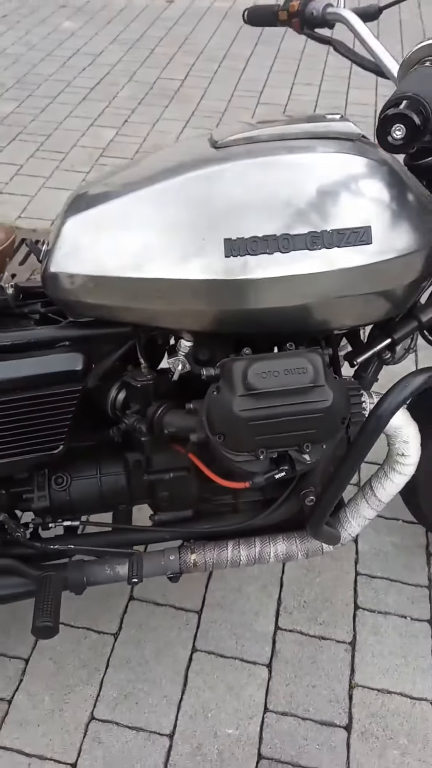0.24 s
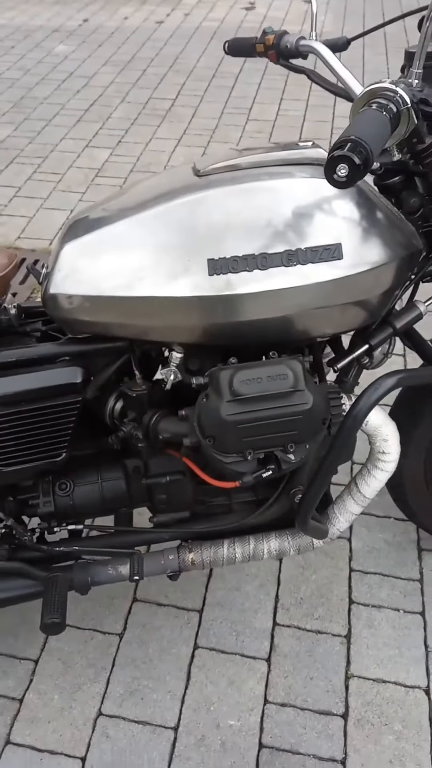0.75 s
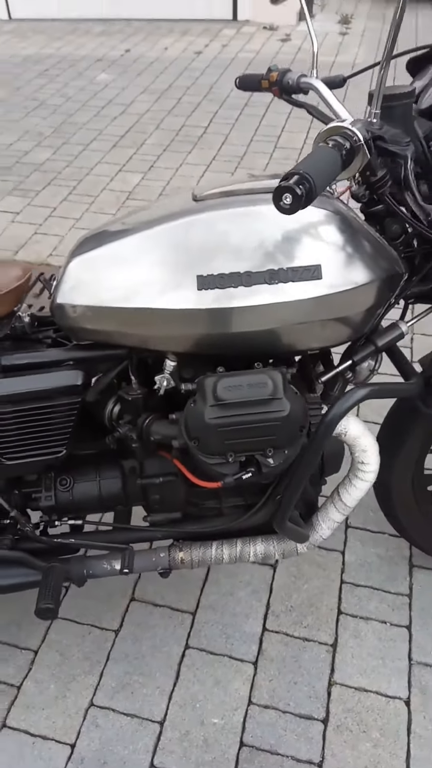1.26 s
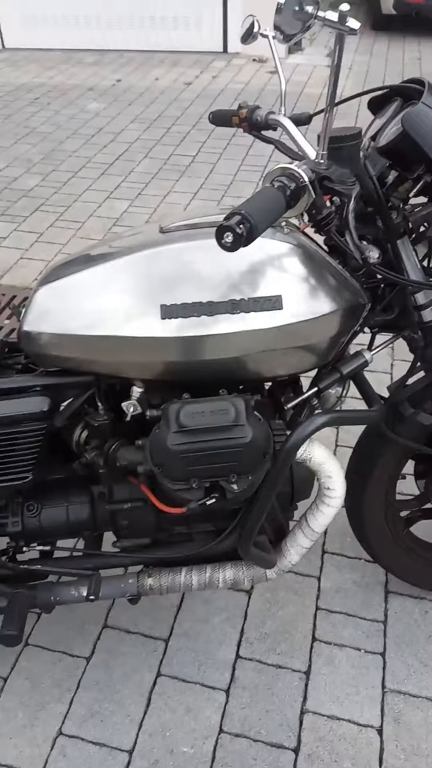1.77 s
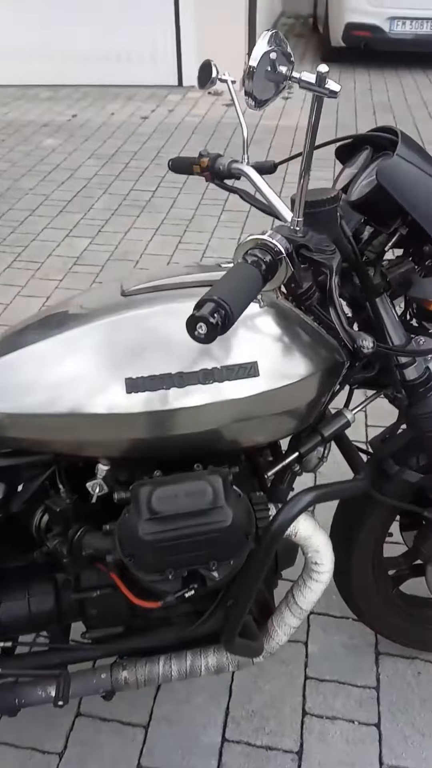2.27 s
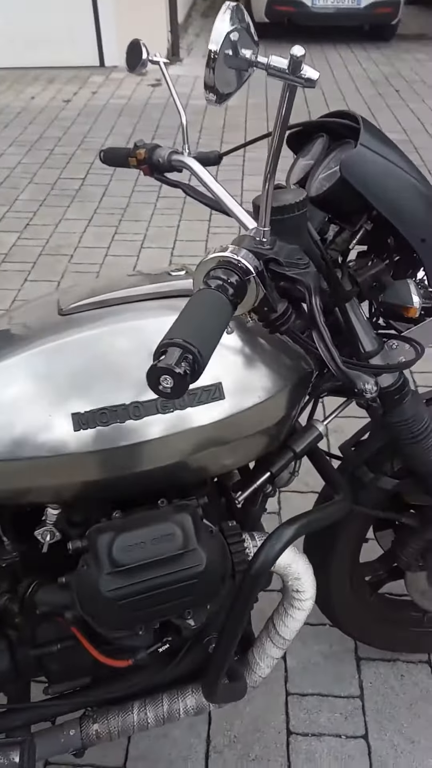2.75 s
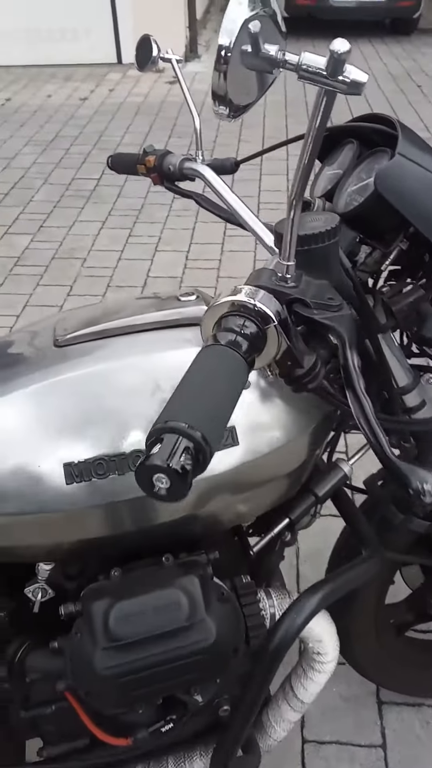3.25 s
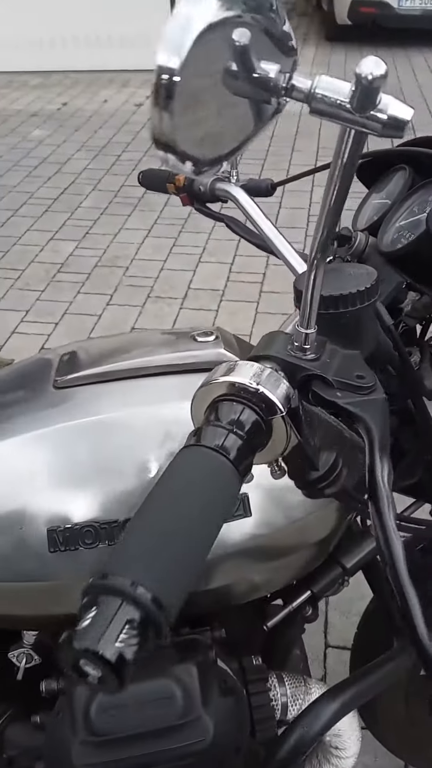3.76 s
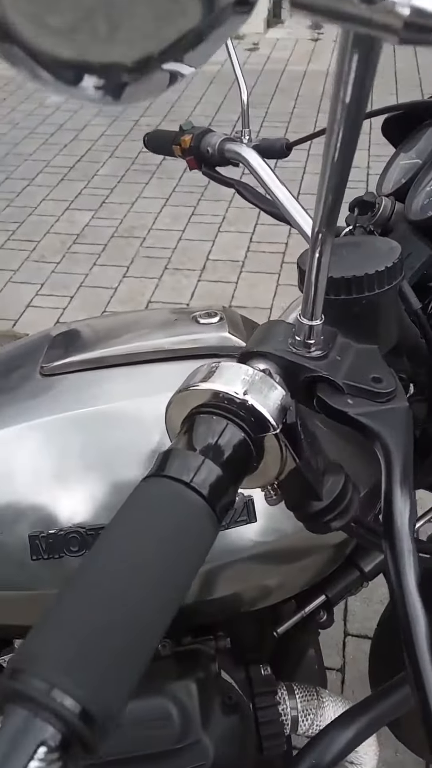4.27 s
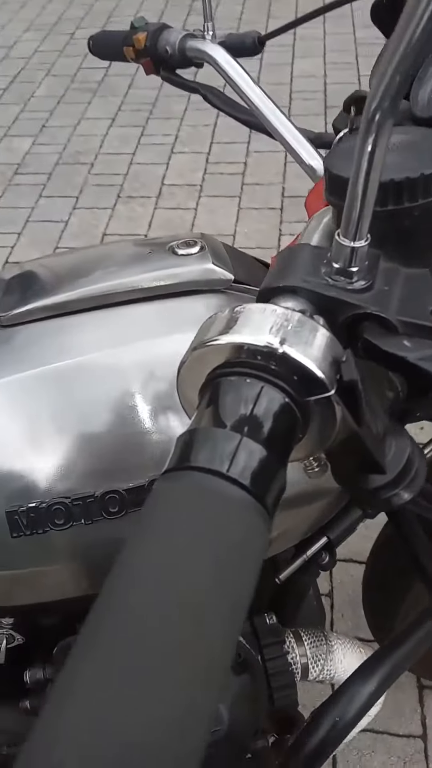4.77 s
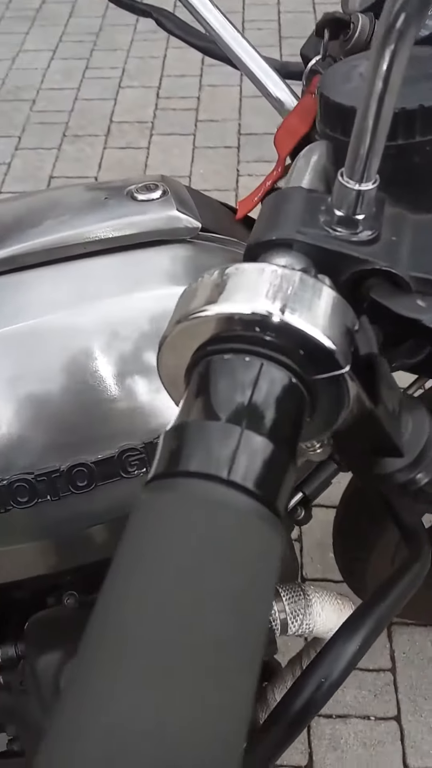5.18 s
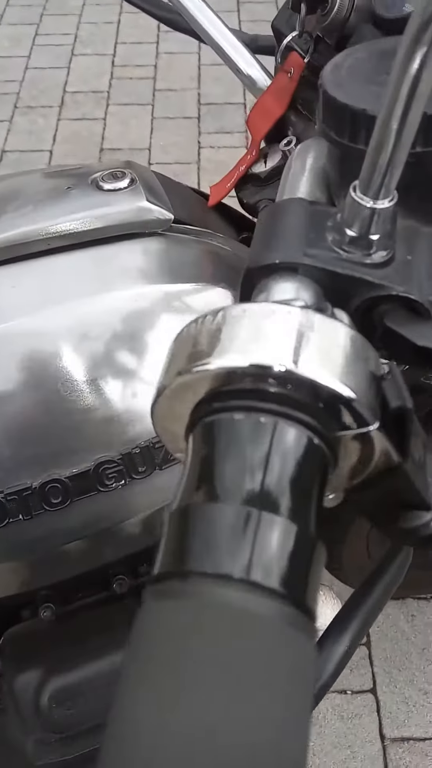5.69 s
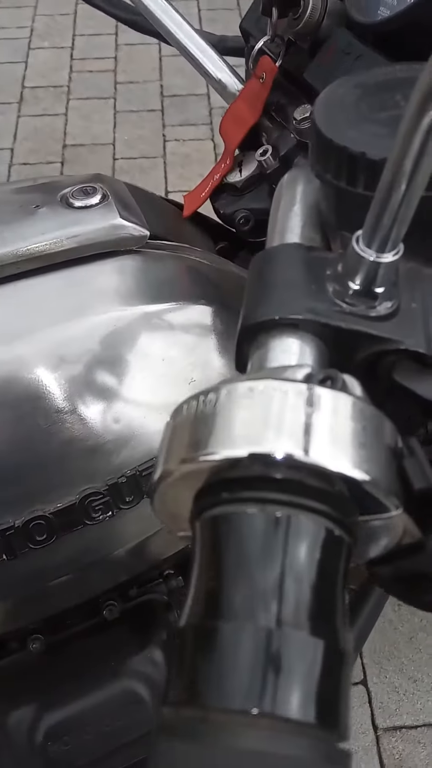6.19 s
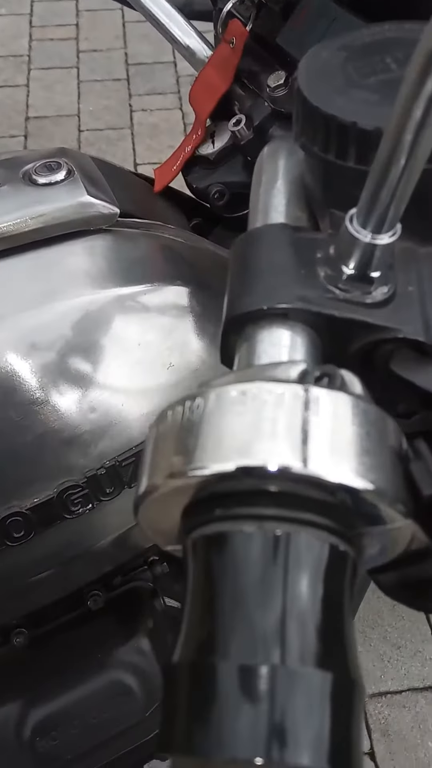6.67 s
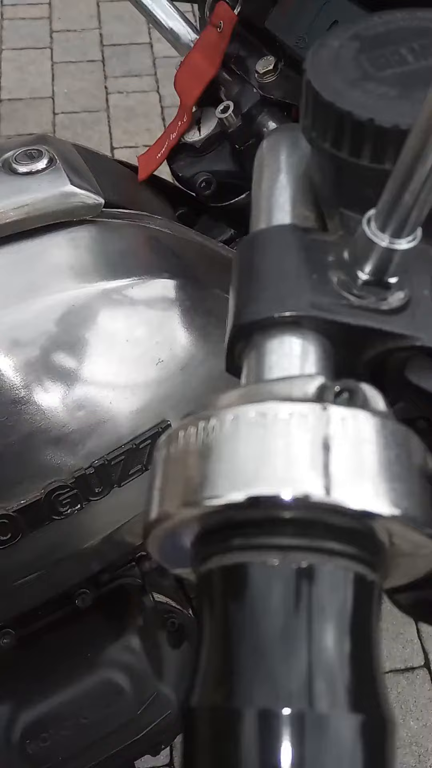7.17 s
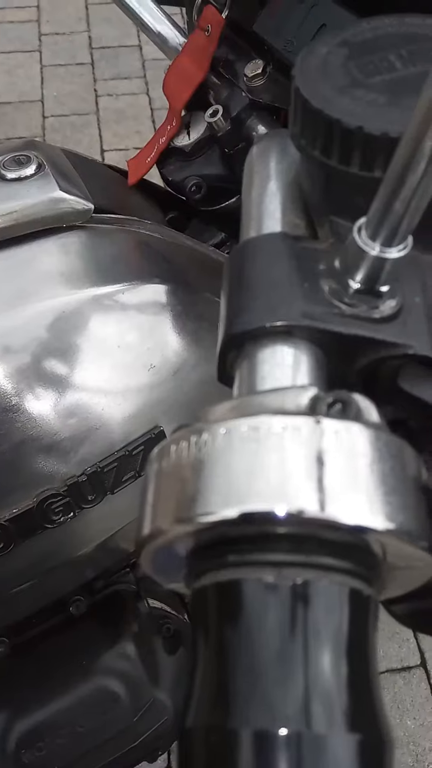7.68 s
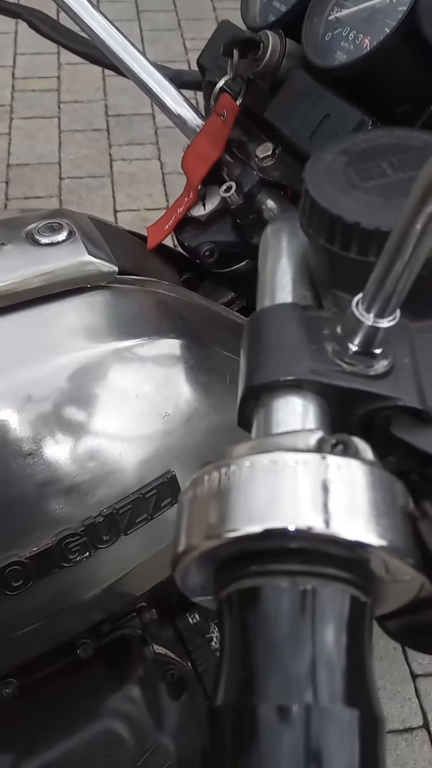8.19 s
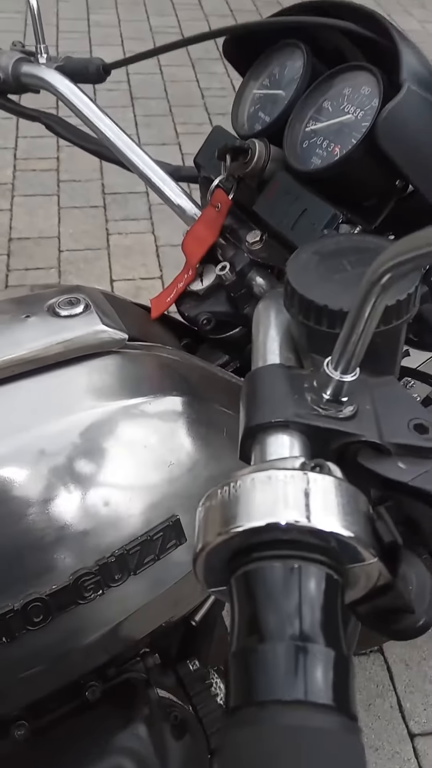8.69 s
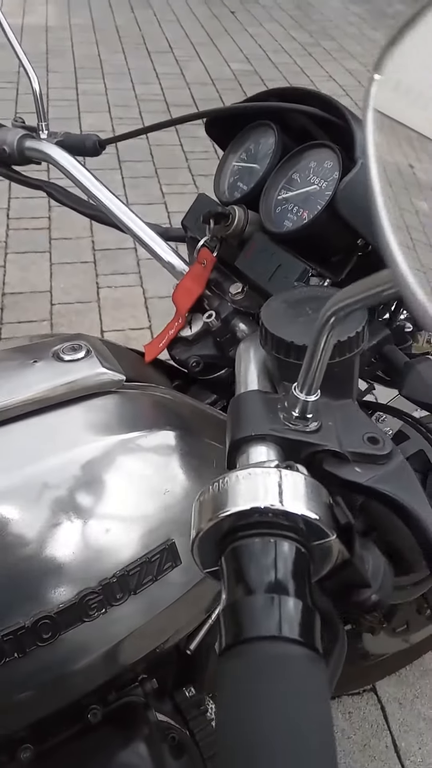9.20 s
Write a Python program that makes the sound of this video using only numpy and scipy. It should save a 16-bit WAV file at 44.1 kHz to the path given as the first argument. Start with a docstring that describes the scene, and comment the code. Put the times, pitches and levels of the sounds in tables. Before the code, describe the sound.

A twin-cylinder motorcycle idles outdoors on paving, heard from very close. The exhaust thumps in a deep, uneven two-beat with a low burble, while valves tick and gears whirr and rattle in time. A few beats come weak early on, and the tone shifts slightly as the microphone rises from the engine to the handlebar. The idle sags around the middle, then recovers and carries on.

```python
"""A V-twin motorcycle idles on paving: each cylinder booms through its own silencer in an uneven two-beat,
gas burbles in the pipes, and gears, pushrods and valves ring the castings in step with the crank.
At first the listener draws close to the engine's side, and a few firings come weak. From about 2 to 4 s
the listener rises to the handlebar. The hunting idle sags to its slowest just after 5 s, then recovers,
and two more weak firings follow near the end."""
import sys
import numpy as np
from scipy import signal
from scipy.fft import rfft, irfft, next_fast_len
from scipy.io import wavfile

SR = 44100
rng = np.random.default_rng(int(sys.argv[2]) if len(sys.argv) > 2 else 0)


def unload_audio(sound):
    """Save the sound as a 16-bit wav file, at the path given as the first command line argument."""
    columns = np.transpose(np.atleast_2d(sound))
    # keep every value between -1 and 1, then stretch to whole-number steps
    steps = np.round(np.clip(columns, -1, 1) * 32767)
    wavfile.write(sys.argv[1], SR, steps.astype(np.int16))


N = 416304
TIME = np.arange(N) / SR
PADDED = next_fast_len(N + SR // 10, True)

# modes of castings, covers and fins: (frequency [Hz], width [Hz], peak height [dB])
CASTING_MODES = [(550, 49, 1.5), (640, 38, 3.5), (1360, 78, 4.5), (2200, 60, 2), (2506, 32, 6.5),
                 (2902, 29, 8.5), (3246, 44, 6.5), (3410, 34, 7.5), (3910, 48, 2.5), (4260, 50, 3),
                 (4830, 170, 4.5), (6506, 153, 5), (7240, 90, 11.5)]


def gain_of(db):
    """Amplitude ratio of a level in decibels."""
    return 10 ** (np.asarray(db) / 20)


def unit_rms(x):
    """Normalisation to an rms of 1."""
    return x / np.sqrt(np.mean(x ** 2) + 1e-20)


def over_time(points):
    """Linear interpolation of a curve at every sample."""
    return np.interp(TIME, *np.transpose(points))


def over_frequency(points, hz):
    """Interpolation of a spectrum on a log-frequency axis."""
    f, value = np.transpose(points)
    return np.interp(np.log(hz + 1), np.log(f + 1), value)


def peaks_db(peaks, hz):
    """Resonance curves: a sum of Lorentzian peaks and dips, in decibels."""
    return sum(height / (1 + (2 * (hz - f) / width) ** 2) for f, width, height in peaks)


def colour(x, spectrum, peaks=(), size=16384):
    """Minimum-phase filtering: the response is causal, so resonances ring on after a blow."""
    hz = np.fft.rfftfreq(size, 1 / SR)
    db = over_frequency(spectrum, hz) + peaks_db(peaks, hz)
    cepstrum = irfft(np.log(gain_of(db)))
    cepstrum[1:size // 2] *= 2
    cepstrum[size // 2 + 1:] = 0
    response = irfft(np.exp(rfft(cepstrum)))[:size // 2]
    return signal.oaconvolve(np.atleast_2d(x), response[None], axes=1)[:, :N]


def drift(per_s):
    """Slow random modulation: straight lines between Gaussian values."""
    knots = np.arange(0, TIME[-1] + 1, 1 / per_s)
    return np.interp(TIME, knots, rng.standard_normal(len(knots)))


def chatter(strikes, decay_s):
    """Damping: each impulse becomes an exponentially decaying burst of noise."""
    envelope = signal.lfilter([1], [1, -np.exp(-1 / (decay_s * SR))], strikes)
    return envelope * rng.standard_normal((2, N))


def impacts(per_s, spread_db, rub):
    """Contact noise: tiny metal impacts arrive as a Poisson process over steady rubbing."""
    sizes = gain_of(spread_db * np.minimum(rng.exponential(1, N), 4))
    strikes = sizes * (rng.random(N) < per_s / SR)
    contacts = unit_rms(chatter(strikes, decay_s=0.00038))
    return unit_rms(contacts + rub * rng.standard_normal((2, N)))


def by_place(beside, above):
    """Linear crossfade as the listener moves between the engine's side and the handlebar above it."""
    # listener's path: (time [s], position [0 beside the engine, 1 at the handlebar])
    path = [(0, 0.34), (2.2, 0.032), (4, 0.9), (9.44, 0.88)]
    return beside + (above - beside) * over_time(path)


def place_gain(beside_db, above_db):
    """A source's level depends on where the listener is."""
    return gain_of(by_place(beside_db, above_db))


def cycles(start_phase=-0.4703):
    """Phase is the integral of speed: counts four-stroke cycles, each two turns of the crank."""
    # hunting idle: (time [s], crank speed [rpm])
    idle_speed = [(0.0, 718.4), (0.7, 696.7), (0.79, 629.1), (1.1, 700.2), (2.32, 686.3), (2.96, 728.5),
                  (3.53, 629.4), (3.64, 680.5), (4.3, 610.4), (4.39, 659.6), (5.31, 577.1), (5.42, 631.4),
                  (6.02, 639.8), (6.11, 690.4), (6.68, 653.2), (6.91, 716.4), (7.11, 655.8), (7.84, 671.4),
                  (7.93, 725.3), (8.68, 696.3), (8.78, 647.5), (9.44, 708.6)]
    return start_phase + np.cumsum(over_time(idle_speed)) / (120 * SR)


def once_a_cycle(phase, spread_db, unusual=()):
    """Impulse train locked to the crank, of random strength; an unusual impulse replaces the nearest."""
    turned = cycles()
    due = np.arange(np.ceil(turned[0] - phase), turned[-1] - phase) + phase
    times = np.interp(due, turned, TIME)
    sizes_db = spread_db * np.clip(rng.standard_normal(len(times)), -2, 1)
    for time_s, db in unusual:
        nearest = np.argmin(abs(times - time_s))
        times[nearest], sizes_db[nearest] = time_s, db
    train = np.zeros(N)
    inside = (times >= 0) & (times < (N - 1) / SR)
    train[np.round(times[inside] * SR).astype(int)] = gain_of(sizes_db[inside])
    return train


def cam_load(slack_db=-4.5, attack_cycles=0.027, release_cycles=0.029):
    """Periodic loading of the valve train: each cam lift builds, holds and lets go; their powers add."""
    # cam lifts: (start [cycles], length [cycles], level [dB])
    lifts = [(0.298, 0.29, -3), (.6, 0.11, 2.2), (.69, .31, 4)]
    phase = np.linspace(0, 1, 500)
    power = gain_of(slack_db) ** 2
    for start, length, db in lifts:
        age = (phase - start + attack_cycles / 2) % 1
        rise = np.minimum(age / attack_cycles, 1)
        fall = np.exp(-np.maximum(age - length, 0) / release_cycles)
        power = power + gain_of(db) ** 2 * rise * fall
    return np.sqrt(np.interp(cycles() % 1, phase, power))


def reflections(x, t60_s=0.038, echo_db=-7, taps_per_s=3000, size=2500, places=7):
    """Early reflections from tank, frame and paving; the paths change as the listener moves."""
    age, echo = TIME[:size], np.zeros((2, N))
    for place in range(places):
        taps = rng.choice([-1., 1.], (2, size)) * (rng.random((2, size)) < taps_per_s / SR)
        taps *= (age > 0.002) * gain_of(-60 * age / t60_s)
        taps /= np.linalg.norm(taps, axis=1, keepdims=True)
        share = np.maximum(1 - abs(np.linspace(0, places - 1, N) - place), 0)
        echo += signal.oaconvolve(x * np.sqrt(share), taps, axes=1)[:, :N]
    return (x + gain_of(echo_db) * echo) / np.sqrt(1 + gain_of(echo_db) ** 2)


def treble_hiss(load):
    """Broadband noise: a fine hiss fills the top treble, louder under load."""
    # treble hiss: (frequency [Hz], relative level [dB])
    spectrum = [(5000, -6), (8000, -1.5), (9600, 6.5), (11000, -5.5), (12000, 2), (13200, 1.5), (13900, -2),
                (14800, 3), (15500, -0.5)]
    contacts = impacts(per_s=1800, spread_db=2.1, rub=2) * load ** 1.24
    wander = gain_of(0.5 * drift(per_s=8))
    return unit_rms(colour(contacts * wander, spectrum))


def gear_whirr(load):
    """Forced vibration: tooth contacts drive the castings, following the load only slightly."""
    # gear noise: (frequency [Hz], relative level [dB])
    spectrum = [(200, -22), (400, -8), (480, -10), (570, -1), (760, -1.5), (930, -5), (1200, -7.5),
                (1600, -10), (3000, -38.5)]
    contacts = impacts(per_s=600, spread_db=2.5, rub=1.09) * load ** 0.24
    return place_gain(-40.5, -39.4) * unit_rms(colour(contacts, spectrum, CASTING_MODES))


def pushrod_clatter(drive):
    """Impact excitation: pushrods ring the castings' middle modes."""
    # pushrod noise: (frequency [Hz], relative level [dB])
    spectrum = [(500, -17.5), (1000, -8), (1500, -9.5), (1800, 1), (2200, -2), (2800, -3), (3400, -12),
                (4200, -21), (7000, -30.5)]
    contacts = impacts(per_s=1100, spread_db=2.7, rub=1) * drive
    return place_gain(-39.5, -36.5) * unit_rms(colour(contacts, spectrum, CASTING_MODES))


def rocker_rattle(drive, width_hz=420, band_db=-4):
    """Resonance: rockers ring the high modes; one stressed band shifts with the listener's place."""
    # rocker noise: (frequency [Hz], relative level [dB])
    spectrum = [(2000, -31), (3500, -17), (4200, -11.5), (4900, -6), (5500, -2), (6100, -1.4), (6600, -1),
                (7200, -8.5), (8000, -9), (9000, -19.5), (12000, -54)]
    # centre of the stressed band: (time [s], frequency [Hz])
    band_centre = [(0, 5930), (1.3, 6000), (2.3, 6400), (3.6, 6450), (4.5, 5600), (5.6, 5400), (6.8, 5640),
                   (8.1, 6100), (8.8, 5600), (9.44, 5650)]
    contacts = impacts(per_s=1600, spread_db=2.5, rub=1.55) * drive
    rattle = colour(contacts, spectrum, CASTING_MODES)
    # moving band-pass: shift down to 0 Hz, smooth, shift back
    carrier = np.exp(2j * np.pi * np.cumsum(over_time(band_centre)) / SR)
    pole = np.exp(-np.pi * width_hz / SR)
    band = 2 * (carrier * signal.lfilter([1 - pole], [1, -pole], rattle / carrier)).real
    return place_gain(-30, -29.5) * unit_rms(rattle + gain_of(band_db) * band)


def machinery(load):
    """Amplitude modulation: the cam load makes the metal noise throb, most deeply at the handlebar."""
    # slow swell of the sizzle, which clatter and rattle partly follow: (time [s], level [dB])
    treble_level = [(0, -40), (1.2, -42.5), (3.5, -44.5), (4.4, -45.5), (5.3, -42), (6.8, -44.5),
                    (8.2, -43), (9.44, -43.5)]
    treble = gain_of(over_time(treble_level))
    unsteady = gain_of(1.6 * drift(per_s=70) + 0.5 * drift(per_s=9))  # no two turns are alike
    drive = load ** by_place(0.68, 0.86) * unsteady
    whirr = gear_whirr(load)
    clatter = unit_rms(treble) ** 0.3 * pushrod_clatter(drive)
    rattle = unit_rms(treble) ** 0.22 * rocker_rattle(drive)
    return whirr + clatter + rattle + treble * treble_hiss(load)


def struck_casting(strikes, spectrum, decay_s):
    """Damped vibration: each strike dies away as a short chatter in the castings' modes."""
    return unit_rms(colour(chatter(strikes, decay_s), spectrum, CASTING_MODES))


def valve_gear():
    """Periodic impacts: each cycle brings a bright tappet tick, a longer knock and a dull clack."""
    # the three strikes: (frequency [Hz], relative level [dB])
    tick_spectrum = [(700, -1), (1800, -17), (3200, -8.5), (4500, -5.5), (5600, 3.5), (6600, -1),
                     (7600, -12), (10000, -17), (15000, -28)]
    knock_spectrum = [(400, -22), (1000, -14), (1900, -2), (3200, -12), (4000, 4), (4600, -3), (5500, 6.5),
                      (6600, -9), (8000, -14), (15000, -31)]
    clack_spectrum = [(500, -11), (1300, 6), (1900, 3), (2800, 0), (3600, -3), (6000, -18), (12000, -36)]
    # harder snaps of the tappet: (time [s], level against a normal tick [dB])
    hard_ticks = [(1.0036, 5), (2.394, 10), (2.7277, 7), (3.2365, 5.5), (3.7823, 3.5), (4.343, 6.5),
                  (6.0736, 8), (7.5018, 7)]
    tappet = once_a_cycle(phase=0.312, spread_db=1.3, unusual=hard_ticks)
    ticks = struck_casting(tappet, tick_spectrum, decay_s=0.006)
    knocks = struck_casting(once_a_cycle(phase=0.668, spread_db=1.7), knock_spectrum, decay_s=0.014)
    clacks = struck_casting(once_a_cycle(phase=0.04, spread_db=0.5), clack_spectrum, decay_s=0.01)
    return (place_gain(-44, -42) * ticks + place_gain(-41.5, -39.5) * knocks
            + place_gain(-47.5, -45) * clacks)


def gas_flow(load, gust_db=2.1, boost_db=5.5):
    """Turbulence: gas burbles through the pipes in gusts, easing when the load is lightest."""
    # flow noise: (frequency [Hz], relative level [dB])
    spectrum = [(5, 1), (22, -2), (38, 6), (80, 3.5), (130, 7), (190, 4), (260, -2), (350, -5), (450, -9),
                (700, -21.5), (1500, -49)]
    # slow swell of the flow: (time [s], relative level [dB])
    flow_level = [(0, -36), (.5, -30), (1, -34.3), (1.8, -34), (3.9, -36), (4.25, -34), (5.2, -38),
                  (6.7, -36.5), (9.44, -37)]
    gusts = load ** 0.17 * gain_of(gust_db * drift(per_s=25))
    burble = unit_rms(colour(gusts * rng.standard_normal((2, N)), spectrum))
    return gain_of(boost_db + over_time(flow_level)) * burble


def exhaust(ring_hz=121, ring_s=0.036, ring_delay_s=0.0203):
    """Impulse response: each firing kicks its own silencer; the first pipe's air column swings on."""
    # transmission of each cylinder's pipe and silencer: (frequency [Hz], gain [dB])
    first_pipe = [(5, 8), (23, 25), (38, 16), (50, 32.5), (72, 42), (92, 47.5), (112, 31.5), (130, 29),
                  (150, 32), (210, 24.5), (300, -2), (500, -8), (1500, -15), (5000, -58)]
    second_pipe = [(5, 11), (23, 27), (38, 26), (50, 23), (72, 40.5), (92, 41), (112, 45.5), (130, 27),
                   (150, -8), (210, 16.5), (300, 4.5), (500, 5), (1500, -46), (5000, -63)]
    # weak firings of the second cylinder: (time [s], level against a normal firing [dB])
    weak_firings = [(1.354, -5.5), (2.219, -4), (2.565, -2.5), (3.069, -5.5), (3.422, -1), (8.035, -2.2),
                    (8.713, -2)]
    first = place_gain(-1.4, -2.5) * once_a_cycle(phase=0, spread_db=0.52)
    second = place_gain(-0.6, -0.5) * once_a_cycle(phase=0.3564, spread_db=1.04, unusual=weak_firings)
    boom = colour(first, first_pipe) + colour(second, second_pipe)
    age = np.maximum(TIME[:SR // 4] - ring_delay_s, 0)
    swell = (age / ring_s * np.exp(1 - age / ring_s)) ** 2
    air_column = swell * np.sin(2 * np.pi * ring_hz * age)
    return boom + gain_of(-28) * signal.oaconvolve(first, air_column)[:N]


def heard_from(spectra, balance, bands, left_lead_s, diffuse_hz=900):
    """Acoustic shadow and path difference: at one place, left and right differ in level and phase."""
    hz = np.fft.rfftfreq(PADDED, 1 / SR)
    db = peaks_db(bands, hz) + np.outer([0.5, -0.5], over_frequency(balance, hz))
    phase_shift = np.exp(1j * np.pi * left_lead_s * np.outer([1, -1], np.minimum(hz, diffuse_hz)))
    return irfft(spectra * phase_shift * gain_of(db), PADDED)[:, :N]


def scene():
    """Superposition: the boom is coherent in both channels, the flow and metal noise only partly so."""
    # likeness of the noise in left and right: (frequency [Hz], correlation [-1 to 1])
    correlation = [(100, 0.9), (280, 0.95), (640, 0.73), (1400, 0.5), (3000, 0.25), (6000, -0.19),
                   (15000, 0)]
    # shadowing beside the engine and at the handlebar: (frequency [Hz], left minus right [dB])
    beside_balance = [(60, -2), (110, -2.0), (200, -1.5), (380, -0.5), (700, 0.0), (1290, -2), (2380, -4),
                      (4400, -13), (8120, -5), (15000, -11.5)]
    above_balance = [(60, 0), (110, -3), (200, -2.0), (380, -1.5), (700, 1), (1290, 2), (2380, -1.5),
                     (4400, -9), (8120, 0), (15000, -8)]
    # bands that carry or are shaded at each place: (frequency [Hz], width [Hz], gain [dB])
    beside_bands = [(1070, 180, 5), (1870, 97, -6.5), (3060, 92, 8.5), (3600, 160, 5), (4100, 190, -6.5),
                    (5860, 180, 5), (6730, 210, 1), (7450, 110, 6), (8500, 500, -4)]
    above_bands = [(785, 130, 3), (1196, 110, -2.5), (1790, 150, 3), (2280, 170, 3), (2680, 81, 2),
                   (3560, 420, -1.5), (4000, 116, 5.5), (5450, 390, 3), (6700, 140, 5), (8000, 250, 3)]
    load = cam_load()
    noise = gas_flow(load) + reflections(machinery(load) + valve_gear())
    left, independent = rfft(noise, PADDED)
    alike = over_frequency(correlation, np.fft.rfftfreq(PADDED, 1 / SR))
    right = alike * left + np.sqrt(1 - alike ** 2) * independent
    spectra = np.array([left, right]) + rfft(exhaust(), PADDED)
    beside = heard_from(spectra, beside_balance, beside_bands, left_lead_s=-54e-6)
    above = heard_from(spectra, above_balance, above_bands, left_lead_s=50e-6)
    return by_place(beside, above)


def record(dry):
    """Band limiting: a steep low-pass filter removes the highest treble."""
    edge_hz = 15650
    low_pass = signal.firwin(511, edge_hz, window=("kaiser", 9), fs=SR)
    return signal.oaconvolve(dry, low_pass[None], "same")


dry = scene()
out = record(dry)
unload_audio(out)
```